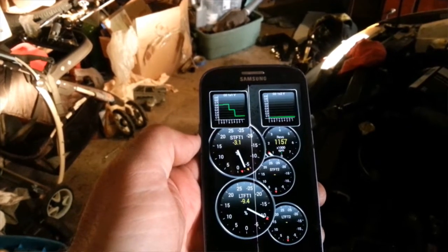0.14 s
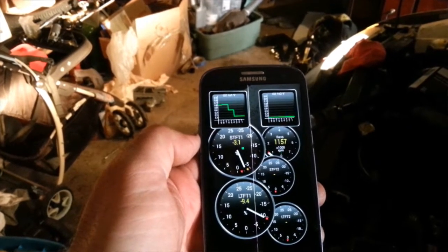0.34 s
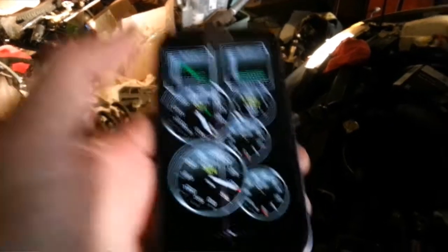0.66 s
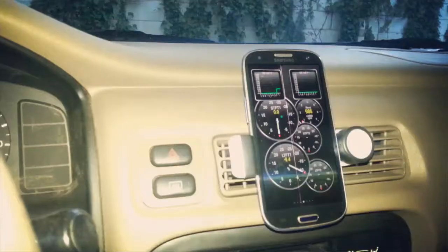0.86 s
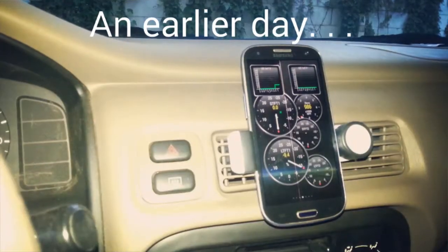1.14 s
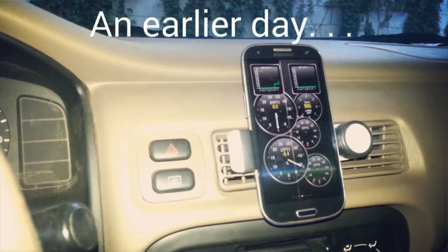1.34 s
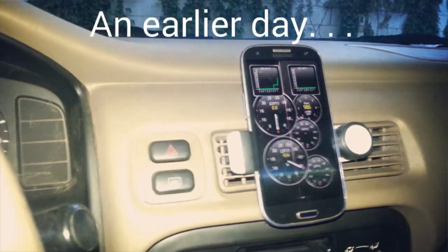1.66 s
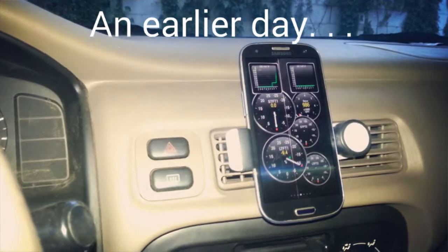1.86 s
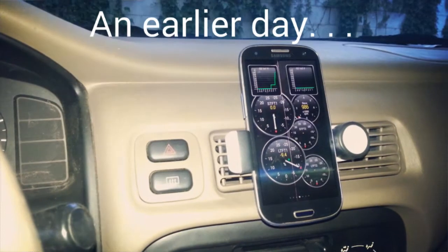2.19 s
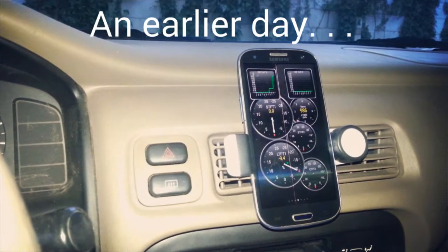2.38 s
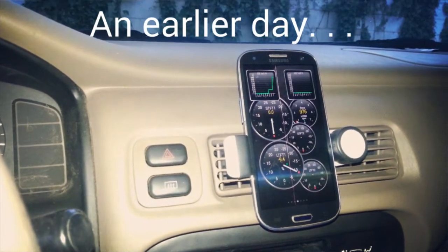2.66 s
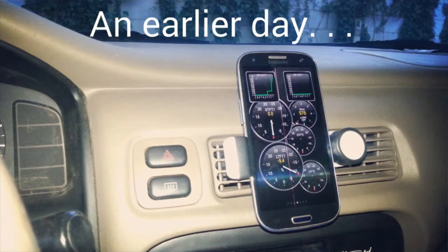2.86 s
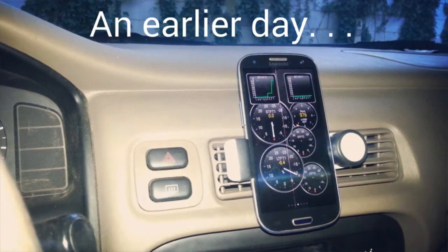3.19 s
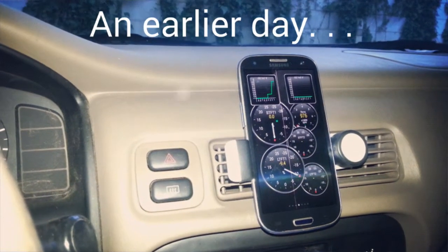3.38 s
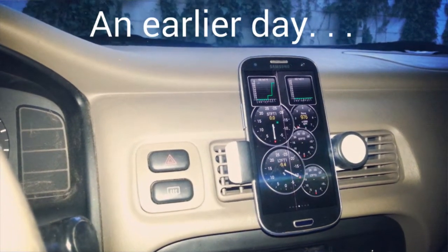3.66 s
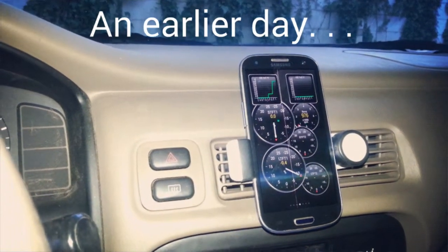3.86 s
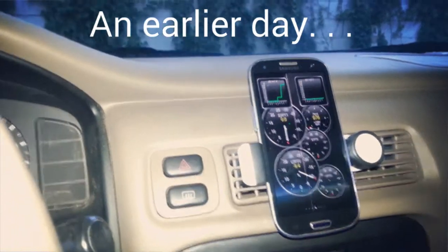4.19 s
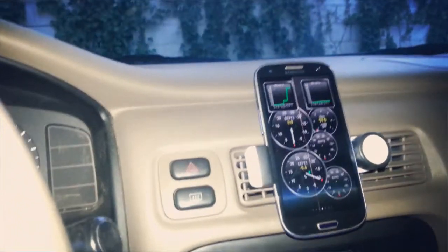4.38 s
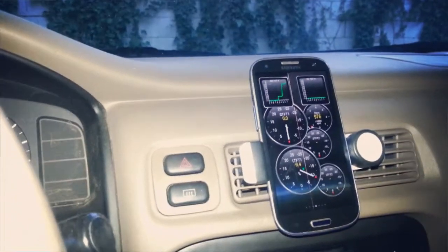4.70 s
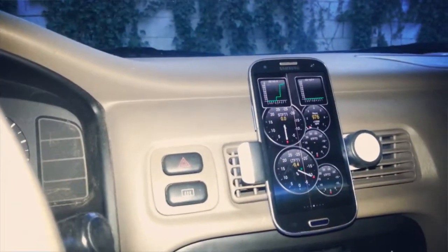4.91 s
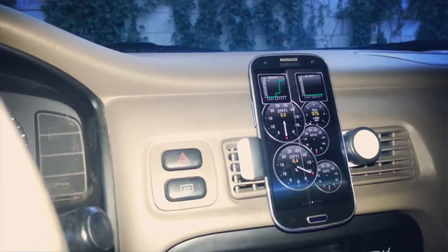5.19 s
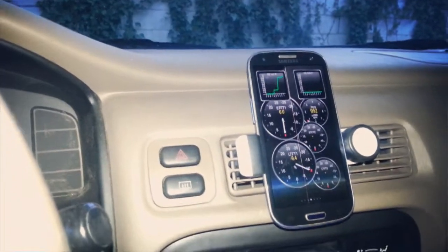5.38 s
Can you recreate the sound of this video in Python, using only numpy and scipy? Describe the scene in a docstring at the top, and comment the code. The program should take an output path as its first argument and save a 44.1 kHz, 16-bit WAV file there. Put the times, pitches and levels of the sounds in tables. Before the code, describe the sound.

A car engine idles close by, cuts off, then returns as a muffled boom inside the cabin, with a few plastic clicks.

```python
"""A four-cylinder car engine idles close by in a garage: firing drone, valve clatter, whining belt-driven parts.
It cuts off; after a short silence the engine fades in as heard from the cabin, a muffled boom that slides
through the standing waves as the cold engine sags and picks up. Dull clatter and a loping whirr pass the
bulkhead. Near the dashboard, plastic clicks and bumps, with soft rustles; faint chirps sit in the hiss."""
import sys
import numpy as np
from scipy import signal
from scipy.fft import rfft, irfft, next_fast_len
from scipy.io import wavfile

SR = 44100
rng = np.random.default_rng(int(sys.argv[2]) if len(sys.argv) > 2 else 0)


def master_out(mix):
    """Clip the mix to full scale and print it as 16-bit PCM to the path in sys.argv[1]."""
    frames = np.transpose(np.atleast_2d(mix))
    ceiling = np.clip(frames, -1, 1)
    pcm = np.round(ceiling * 32767).astype(np.int16)
    wavfile.write(sys.argv[1], SR, pcm)


N = 244701
T = np.arange(N) / SR
GARAGE_END_S = .836


# firing rate: t/s, f/Hz
GARAGE_FIRING_HZ = [(0.0, 38.36), (0.552, 38.49), (0.83, 39.03)]
def garage_engine():
    """The open engine: drone, whines and clatter, all locked to the crankshaft."""
    firings = crank(GARAGE_FIRING_HZ, unsteady=.003)
    return firing_drone(firings) + belt_whine(firings) + valve_clatter(firings)


# harmonics: f/firing rate, relative level/dB
DRONE_ORDERS = [(1, -32), (2, -8), (3, -3.5), (4, -19), (5, 2), (6, -19), (7, -25), (10, -20), (11, -10),
                (12, -22)]
def firing_drone(firings, level_db=-18.5):
    """The firings repeat evenly and fuse into a harmonic drone."""
    drone = sum(gain_of(db) * tone(firings, round(order), flutter=.15) for order, db in DRONE_ORDERS)
    return gain_of(level_db) * evened(drone)


# broad spectrum: f/Hz, relative level/dB
BLOCK_COLOUR = [(25, -29.5), (48, -23.5), (80, -1.5), (250, -0.5), (480, 2.5), (850, -3), (1300, -2),
                (2400, -5.5), (3200, -6.5), (4400, -5.5), (6000, -12.5), (9300, -14), (10300, -32),
                (12200, -18.5), (14500, -39.5)]
# block resonances: f/Hz, width/Hz, lift/dB
BLOCK_RESONANCES = [(451, 10, 4.5), (1112, 110, 8.5), (1294, 30, 13), (1550, 54, 7.5), (1710, 33, 2),
                    (1965, 120, 7.5), (2094, 95, 7.5), (2310, 54, 6.5), (2547, 39, 6), (3780, 190, 6),
                    (4060, 55, -0.5)]
def valve_clatter(firings, level_db=-19, surge_db=.5, surge_hz=2.83, surge_peak_s=.4):
    """Valve taps and rush ring in the block, surging slightly."""
    knocks = valve_train(firings, tap_share=.33, tap_t60_s=.076, throb=.032, rush_lope=.056,
                         tap_lope_db=.5, scatter_db=3, loudest_phase=.85)
    surge = np.cos(2 * np.pi * surge_hz * (T - surge_peak_s))
    return gain_of(level_db + surge_db * surge) * coloured(knocks, BLOCK_COLOUR, BLOCK_RESONANCES)


def valve_train(firings, tap_share, tap_t60_s, throb, rush_lope, tap_lope_db, scatter_db,
                loudest_phase, valves=8):
    """Valves tap in turn over a rush throbbing with each firing; one louder cylinder makes both lope."""
    cycle = firings / 4
    swing = np.cos(2 * np.pi * (cycle - loudest_phase))
    taps, t = np.zeros(N), T[:SR // 20]
    for phase in (np.arange(valves) + rng.uniform(-.25, .25, valves)) / valves:
        voice = rng.standard_normal(len(t))  # common to all taps of this valve
        for at in np.flatnonzero(np.diff(np.floor(cycle - phase))):
            level_db = tap_lope_db * swing[at] + scatter_db * rng.standard_normal()
            tap = voice + .5 * rng.standard_normal(len(t))
            add(taps, T[at], tap * gain_of(level_db - 60 * t / tap_t60_s))
    pulsing = 1 + throb * np.cos(2 * np.pi * firings)
    rush = rng.standard_normal(N) * pulsing * (1 + rush_lope * swing)
    return np.sqrt(tap_share) * evened(taps) + np.sqrt(1 - tap_share) * evened(rush)


# belt-driven parts: f/firing rate, midway level/dB, slope/(dB/s)
BELT_ORDERS = [(14.08, -35.5, 10), (16.88, -33.5, -3.5), (29.2, -32, -0.5), (33, -38, -5.5),
               (33.9, -36, -1), (39.87, -38.5, 19), (45.1, -42, 0.5), (50, -40, -1.5), (54.8, -41, -3.5),
               (75.9, -44, 0), (115.1, -44, 1.5)]
def belt_whine(firings):
    """Belt-driven parts whine at their own multiples of engine speed; some swell, some fade."""
    from_midway_s = np.minimum(T, GARAGE_END_S) - GARAGE_END_S / 2
    return sum(gain_of(db + slope * from_midway_s) * tone(firings, order, flutter=.2)
               for order, db, slope in BELT_ORDERS)


# firing rate of the cold engine: t/s, f/Hz
CABIN_FIRING_HZ = [(1.7, 33.13), (2.6, 32.63), (3.2, 32.38), (4.3, 31.63), (4.75, 31.36), (5.4, 32)]
# boom, hum and thin whines: f/firing rate, base level/dB
CABIN_BOOM = [(2, -35.5), (3, -41.5), (4, -44), (5, -48.5)]
CABIN_HUM = [(7, -51), (8, -56.5), (9, -52), (11, -51.5), (12, -64.5), (14, -54), (15, -56), (16, -63.5),
             (19, -58), (21, -62)]
CABIN_WHINE = [(42.25, -61), (43.5, -62)]
def cabin_engine(clatter_db=-38.5):
    """The engine behind the bulkhead: low boom, faint upper orders, dull clatter and whirr."""
    firings = crank(CABIN_FIRING_HZ, unsteady=.004)
    firing_hz = curve(CABIN_FIRING_HZ)
    boom = standing_waves(firings, firing_hz, CABIN_BOOM, flutter=.092)
    hum = standing_waves(firings, firing_hz, CABIN_HUM, flutter=.32)
    whine = sum(gain_of(db) * tone(firings, order, flutter=.4) for order, db in CABIN_WHINE)
    clatter = dull_clatter(firings) + whirr(firings)
    return boom + hum + whine + gain_of(clatter_db) * clatter


# cabin standing waves: f/Hz, width/Hz, lift/dB
AIR_MODES = [(99.2, 4.8, 8.5), (129.8, 2.3, -23), (133, 2.8, 8.5), (156.7, 2.2, 5), (297.6, 4, 6.5),
             (488, 20.5, 7.5)]
def standing_waves(firings, firing_hz, orders, flutter):
    """Each order swells or sinks as engine speed slides it through the cabin's standing waves."""
    return sum(gain_of(db + lift_db(round(k) * firing_hz, AIR_MODES)) * tone(firings, round(k), flutter)
               for k, db in orders)


# broad spectrum: f/Hz, relative level/dB
DULL_COLOUR = [(20, -15), (50, -1), (85, 2.5), (150, 3.5), (250, -1), (380, -4), (560, -15.5), (900, -11.5),
               (1300, -16.5), (1800, -17), (4000, -26.5), (5200, -27), (8000, -27), (10500, -32),
               (14500, -32.5)]
# resonances: f/Hz, width/Hz, lift/dB
DULL_RESONANCES = [(354, 48, 4), (496, 20, 7.7), (687, 106, 9.9), (4000, 640, 6.2)]
def dull_clatter(firings):
    """Mostly rush with a trace of valve taps, muffled by the bulkhead."""
    rush = valve_train(firings, tap_share=.056, tap_t60_s=.092, throb=.077, rush_lope=.016,
                       tap_lope_db=1, scatter_db=2.5, loudest_phase=.97)
    return coloured(rush, DULL_COLOUR, DULL_RESONANCES)


# broad spectrum: f/Hz, relative level/dB
WHIRR_SPECTRUM = [(150, -37), (500, 11.5), (950, -0.5), (1400, 2), (1650, -5), (4000, -7.5), (5500, -26),
                  (14000, -24)]
# resonances: f/Hz, width/Hz, lift/dB
WHIRR_RESONANCES = [(1261, 103, 9.1), (1400, 60, 7.8), (2500, 76, 10)]
def whirr(firings, relative_db=-9.5):
    """Dense ticking comes through the bulkhead, swelling once a cycle."""
    ticking = valve_train(firings, tap_share=.56, tap_t60_s=.043, throb=.07, rush_lope=.34,
                          tap_lope_db=6, scatter_db=2, loudest_phase=1, valves=16)
    return gain_of(relative_db) * coloured(ticking, WHIRR_SPECTRUM, WHIRR_RESONANCES)


# clicks and bumps: t/s, snap peak/dB, band low/Hz, band high/Hz, thud level/dB, thud f/Hz
CLICK_EVENTS = [(1.8539, -23, 2100, 4850, -43, 297), (4.155, -36, 452, 900, -22.5, 366),
                (4.659, -31, 1200, 8000, -46, 300), (5.3295, -5.5, 1100, 2320, -14, 160),
                (5.375, -32, 1400, 2400, -46, 400), (5.389, -23.5, 3500, 11000, -27, 493)]
# plastic modes: f/Hz, level re snap/dB, t60/s
PLASTIC_RING = [(3340, -14, .007), (4150, -9.5, .0038), (5600, -14, 0.0052), (8600, -28, .003)]
def clicks(crack_db=-27, crack_t60_s=.029, thud_t60_s=.035, thud_delay_s=.00194):
    """Plastic snaps with a hollow ring and a bright crack; then the part that carries it thuds."""
    out, t = np.zeros(N), T[:SR // 10]
    ring = sum(np.sin(2 * np.pi * hz * t) * gain_of(db - 60 * t / t60) for hz, db, t60 in PLASTIC_RING)
    for start_s, snap_db, low_hz, high_hz, thud_db, thud_hz in CLICK_EVENTS:
        band = signal.butter(3, [low_hz, high_hz], "bandpass", fs=SR, output="sos")
        snap = signal.sosfilt(band, signal.unit_impulse(len(t)))
        crack = rng.standard_normal(len(t)) * gain_of(crack_db - 60 * t / crack_t60_s)
        thud = np.sin(2 * np.pi * thud_hz * t) * gain_of(thud_db - 60 * t / thud_t60_s)
        add(out, start_s, gain_of(snap_db) * (snap / abs(snap).max() + ring + crack))
        add(out, start_s + thud_delay_s, thud)
    return out


# handling rustles: centre t/s, half length/s, level/dB
RUSTLE_EVENTS = [(4.246, .07, -44), (5.387, 0.11, -38.5)]
# broad spectrum: f/Hz, relative level/dB
RUSTLE_SPECTRUM = [(30, -7), (150, 2), (500, -5.5), (1500, -11), (4000, -19), (14000, -32)]
def rustles(grain=.3):
    """Brief grainy swells of rubbing near the dashboard."""
    swells = sum(gain_of(db) * np.exp(-((T - s) / half_s) ** 2) for s, half_s, db in RUSTLE_EVENTS)
    rubbing = rng.standard_normal(N) * (1 + grain * wander(80))
    return swells * coloured(rubbing, RUSTLE_SPECTRUM, [])


# high chirps: centre t/s, level/dB, f/Hz
CHIRP_EVENTS = [(1.6, -61, 7700), (2.45, -58, 7850), (4.8, -56, 8050)]
def chirps(half_length_s=.066, blur_hz=380):
    """Thin, blurred peeps that barely rise out of the hiss."""
    peeps = sum(gain_of(db) * np.exp(-((T - s) / half_length_s) ** 2) * np.sin(2 * np.pi * hz * T)
                for s, db, hz in CHIRP_EVENTS)
    return peeps * wander(blur_hz)


def crank(rate_table, unsteady):
    """Running count of firings; the speed is never quite even."""
    return np.cumsum(curve(rate_table) * (1 + unsteady * wander(12))) / SR


def tone(firings, order, flutter):
    """One line locked to the crankshaft, wavering in level."""
    carrier = np.sqrt(2) * np.cos(2 * np.pi * (order * firings + rng.random()))
    return carrier * (1 + flutter * wander(8.3))


def coloured(x, colour, modes, size=8192):
    """Rings x through a body, a broad colour with resonances on top; rms 1."""
    hz = np.fft.rfftfreq(size, 1 / SR)
    colour_hz, colour_db = np.transpose(colour)
    db = np.interp(np.log(hz + 1), np.log(colour_hz), colour_db) + lift_db(hz, modes)
    log_gain = np.log(gain_of(np.r_[db, db[-2:0:-1]]))
    minimum_phase = np.exp(np.conj(signal.hilbert(log_gain)))
    ring = np.fft.ifft(minimum_phase).real[:size // 2]
    return evened(signal.oaconvolve(x, ring)[:N])


def lift_db(hz, modes):
    """Summed lift of the resonances at hz."""
    return sum(lift / (1 + (2 * (hz - f) / width) ** 2) for f, width, lift in modes)


def wander(hz):
    """Random drift up to about hz; rms 1."""
    size = next_fast_len(N, real=True)
    rolloff = 1 + (np.fft.rfftfreq(size, 1 / SR) / hz) ** 4
    return evened(irfft(rfft(rng.standard_normal(size)) / rolloff, size)[:N])


def curve(rows):
    """A time table at every sample."""
    return np.interp(T, *np.transpose(rows))


def gain_of(db):
    """Decibels to amplitude."""
    return 10 ** (np.asarray(db) / 20)


def evened(x):
    """Scales to rms 1."""
    return x / np.sqrt(np.mean(x ** 2) + 1e-20)


def add(mix, start_s, sound):
    """Mixes a sound in at start_s."""
    part = mix[round(start_s * SR):][:len(sound)]
    part += sound[:len(part)]


def scene(cut_s=.0063, cabin_start_s=1.199, fade_s=.31):
    """The garage cuts off; after a silence the cabin fades in."""
    garage = garage_engine() * np.clip((GARAGE_END_S - T) / cut_s, 0, 1)
    cabin = cabin_engine() + clicks() + rustles() + chirps()
    fade_in = np.clip((T - cabin_start_s) / fade_s, 0, 1)
    return (garage + cabin * fade_in)[None]


def record(dry, cutoff_hz=14650):
    """Steep low-pass band limit."""
    lowpass = signal.firwin(511, cutoff_hz, window=("kaiser", 9), fs=SR)
    return signal.oaconvolve(dry, lowpass[None], "same")


dry = scene()
out = record(dry)
master_out(out)
```